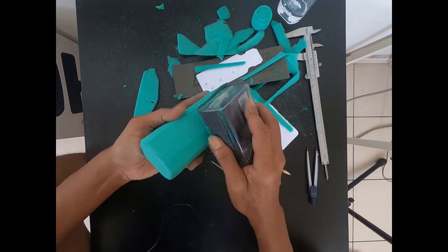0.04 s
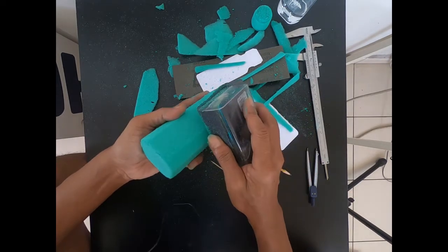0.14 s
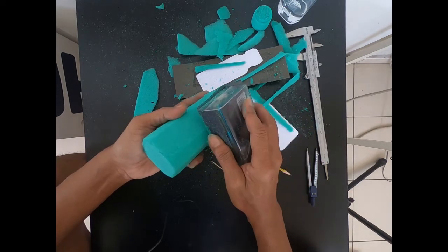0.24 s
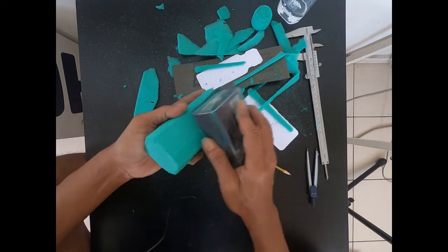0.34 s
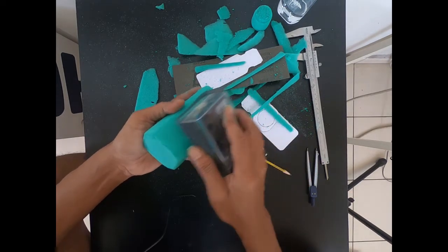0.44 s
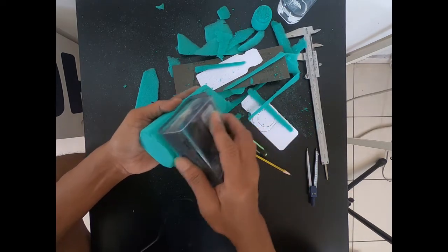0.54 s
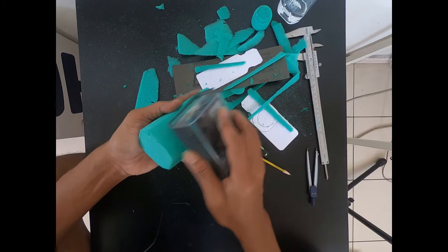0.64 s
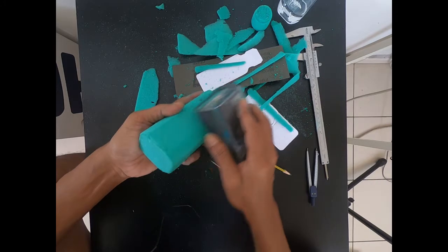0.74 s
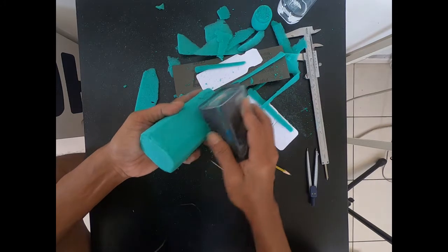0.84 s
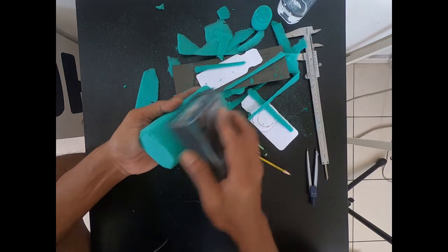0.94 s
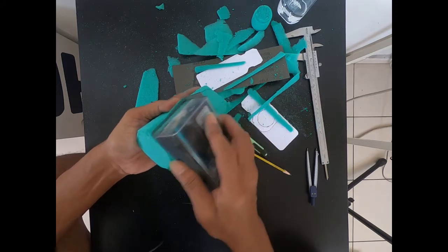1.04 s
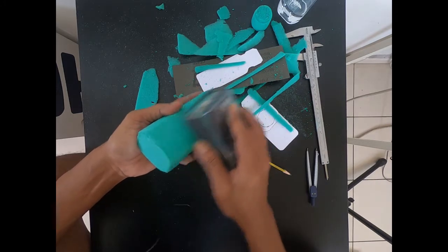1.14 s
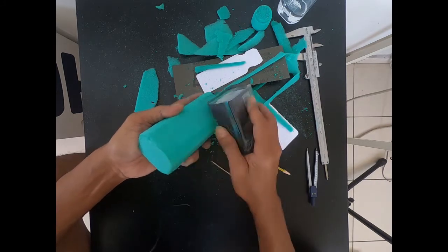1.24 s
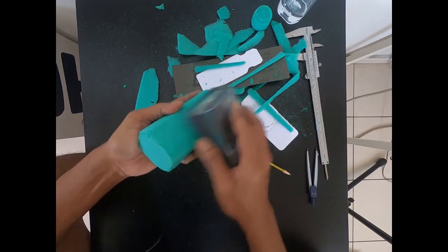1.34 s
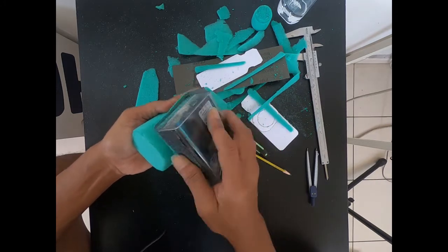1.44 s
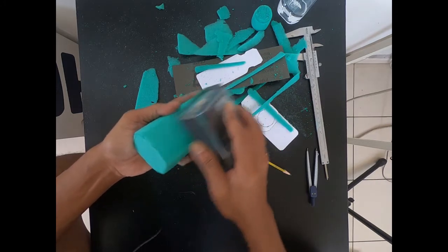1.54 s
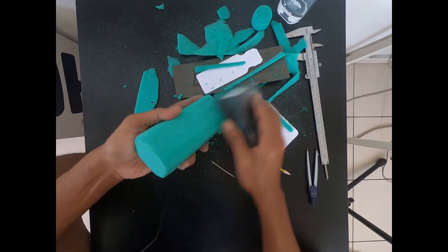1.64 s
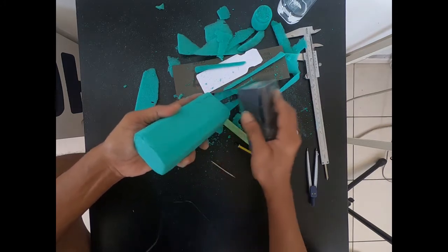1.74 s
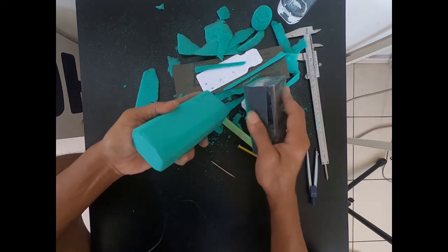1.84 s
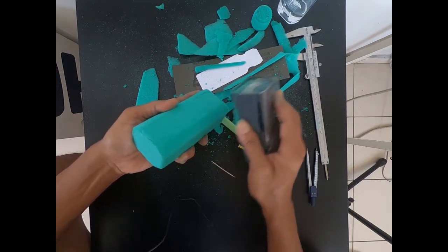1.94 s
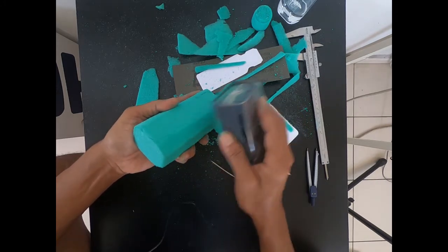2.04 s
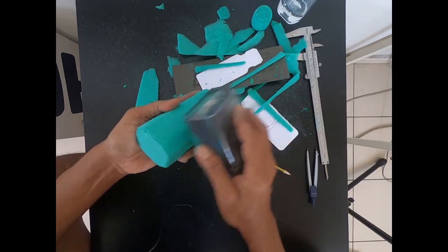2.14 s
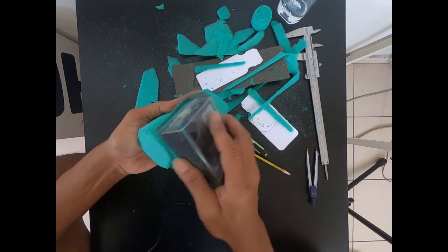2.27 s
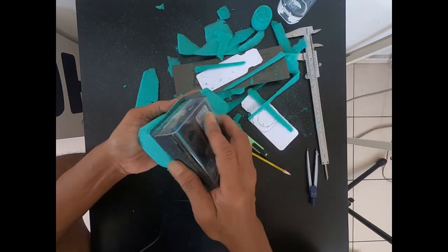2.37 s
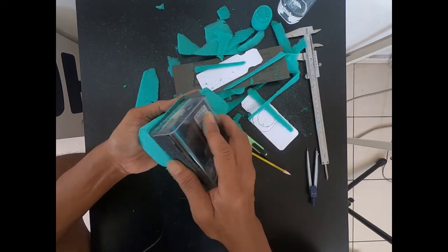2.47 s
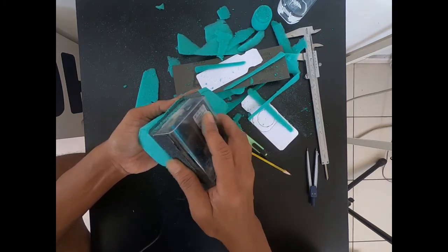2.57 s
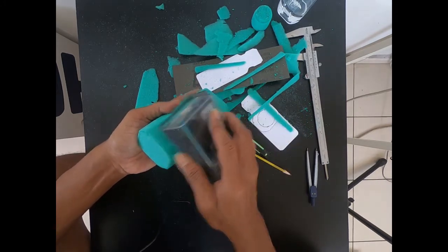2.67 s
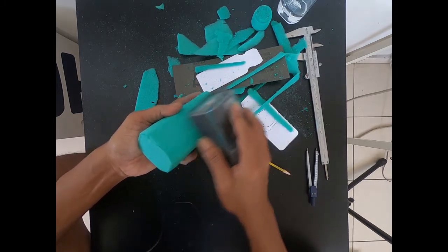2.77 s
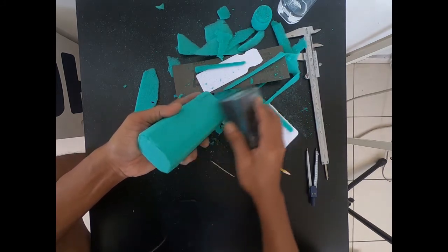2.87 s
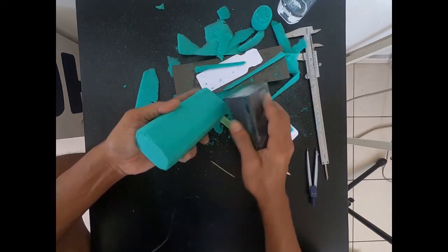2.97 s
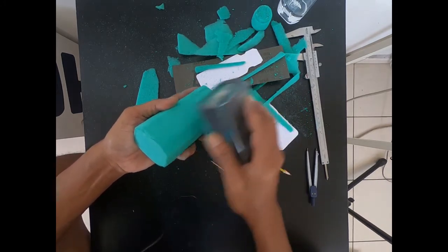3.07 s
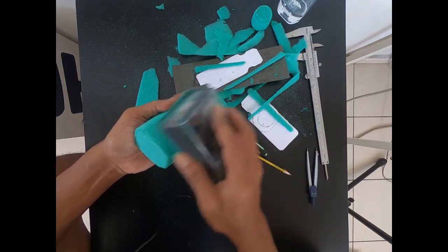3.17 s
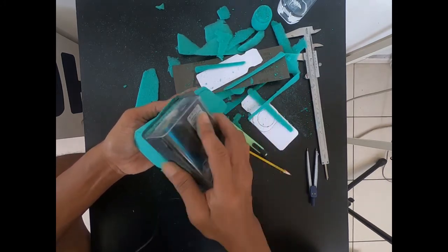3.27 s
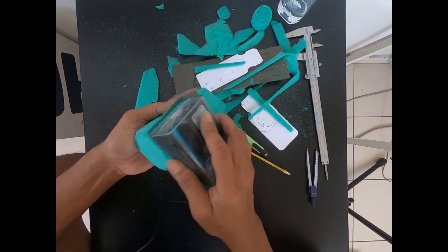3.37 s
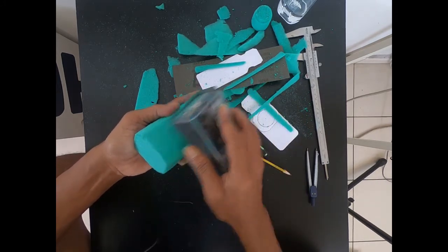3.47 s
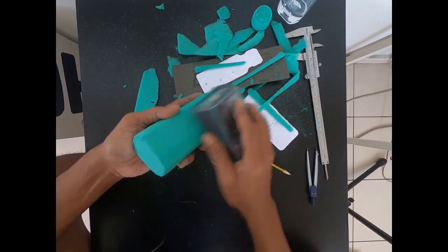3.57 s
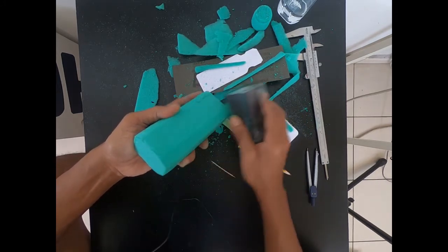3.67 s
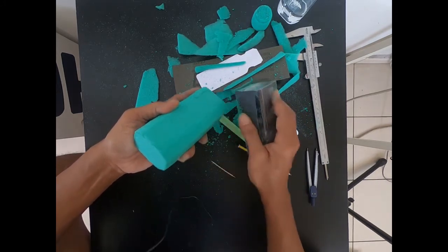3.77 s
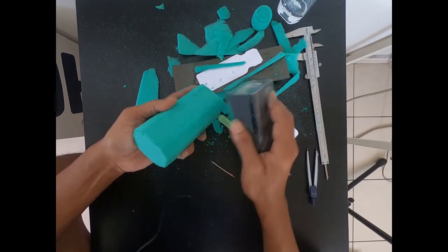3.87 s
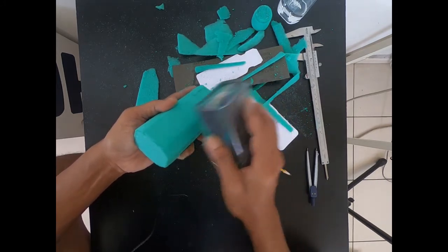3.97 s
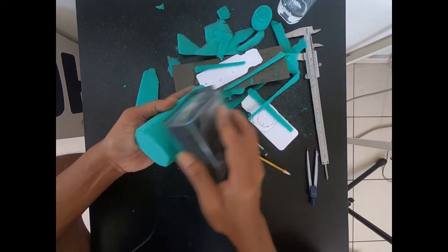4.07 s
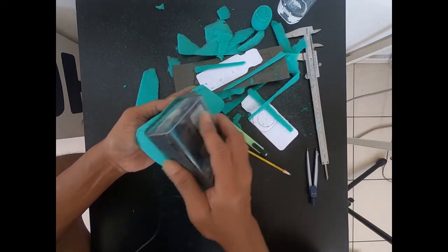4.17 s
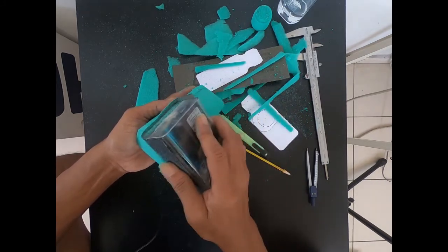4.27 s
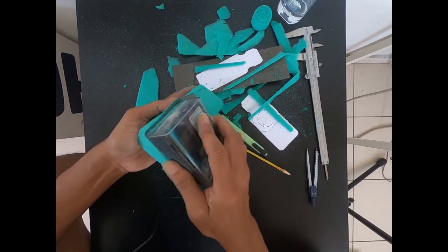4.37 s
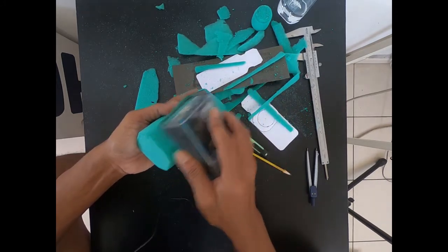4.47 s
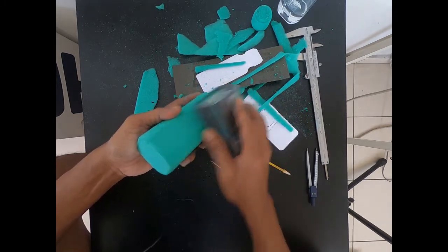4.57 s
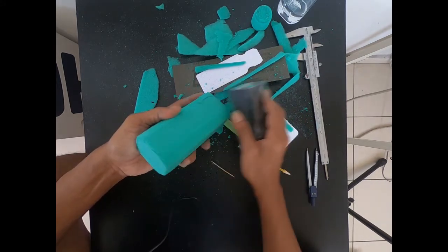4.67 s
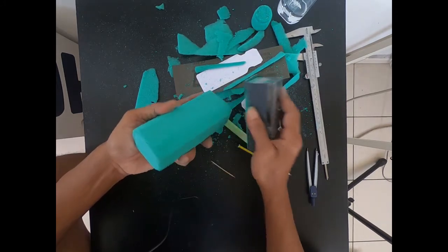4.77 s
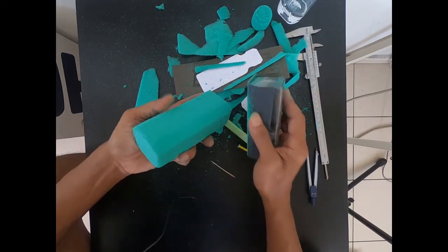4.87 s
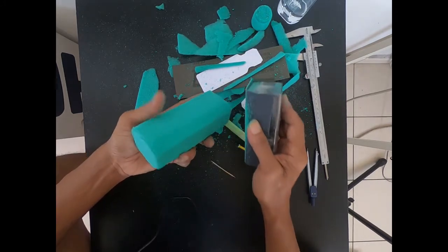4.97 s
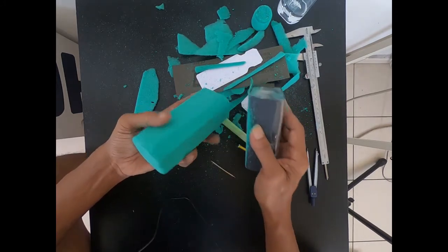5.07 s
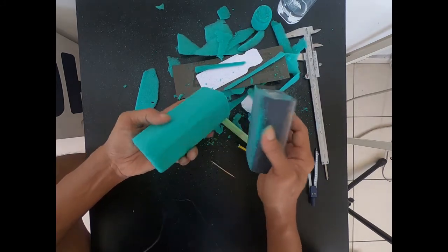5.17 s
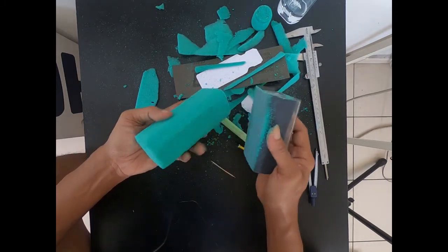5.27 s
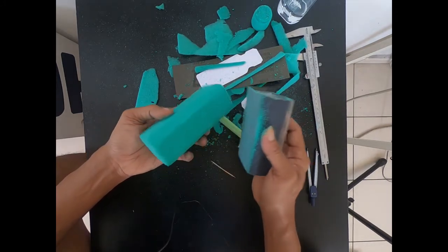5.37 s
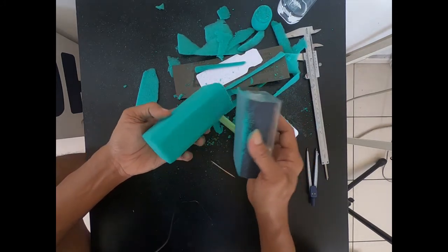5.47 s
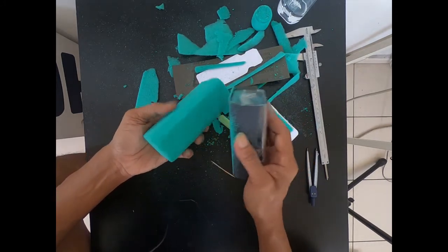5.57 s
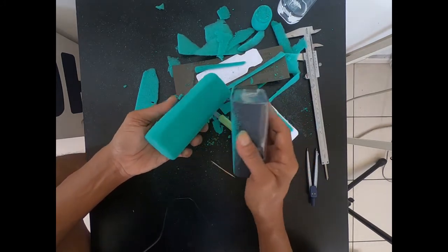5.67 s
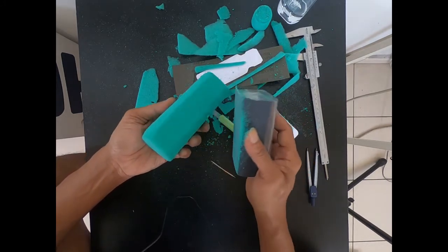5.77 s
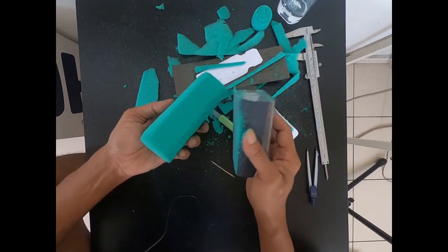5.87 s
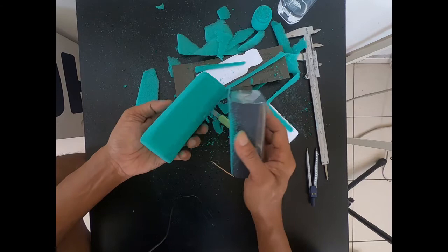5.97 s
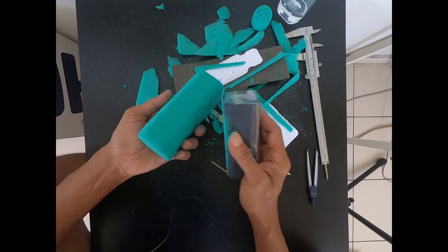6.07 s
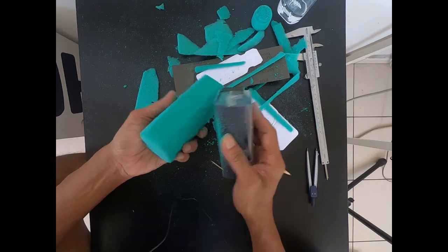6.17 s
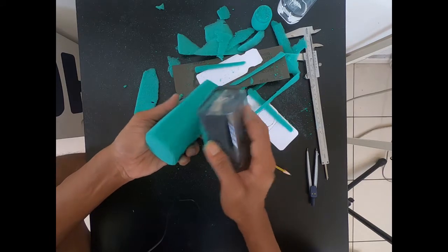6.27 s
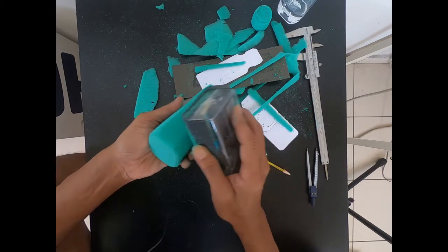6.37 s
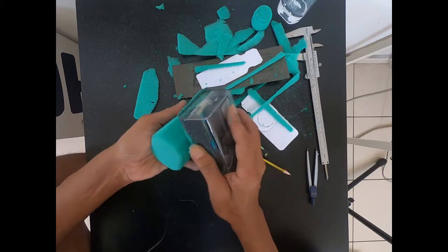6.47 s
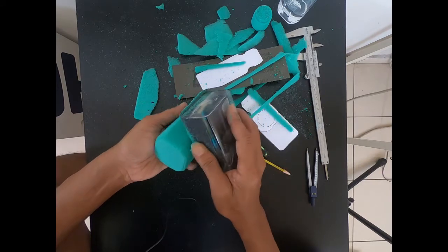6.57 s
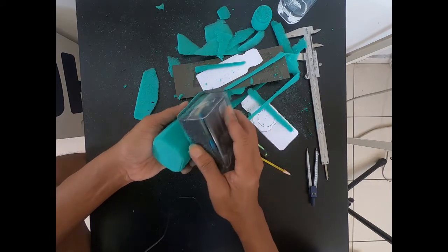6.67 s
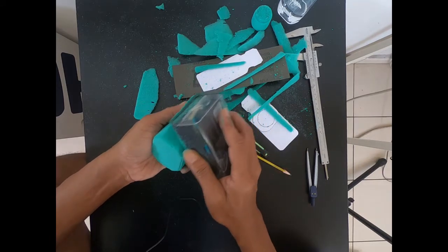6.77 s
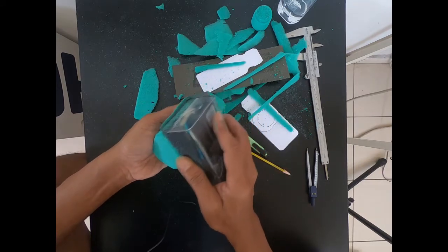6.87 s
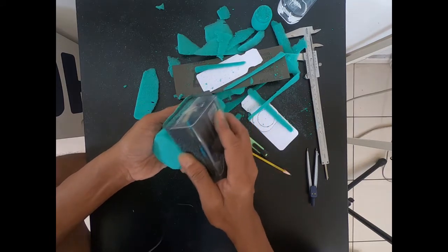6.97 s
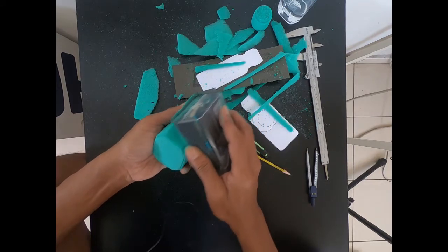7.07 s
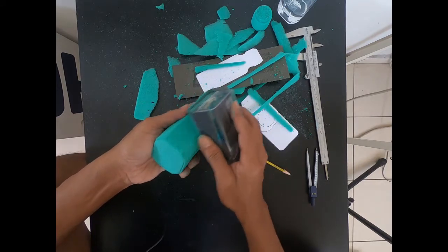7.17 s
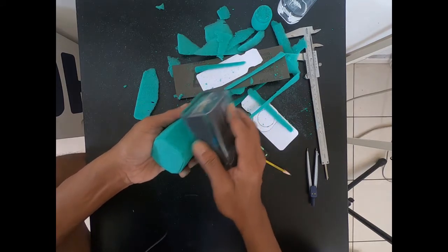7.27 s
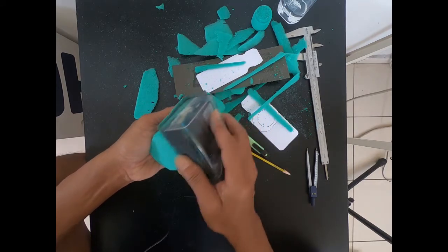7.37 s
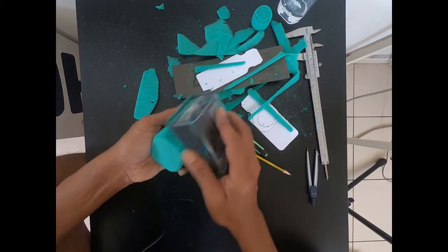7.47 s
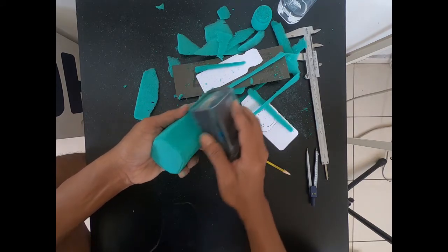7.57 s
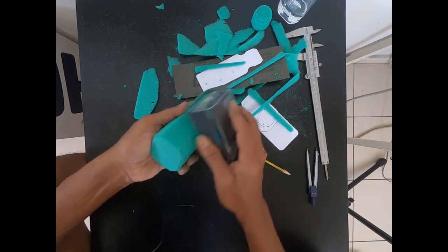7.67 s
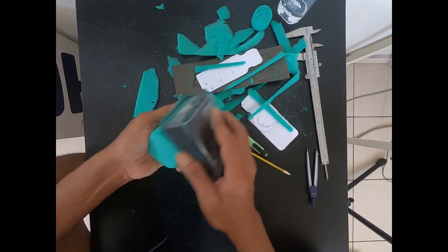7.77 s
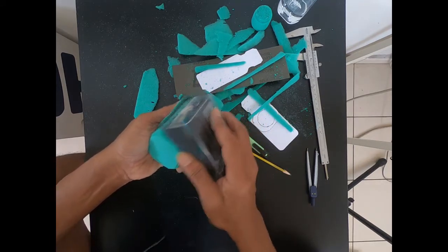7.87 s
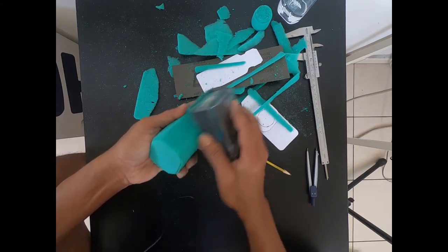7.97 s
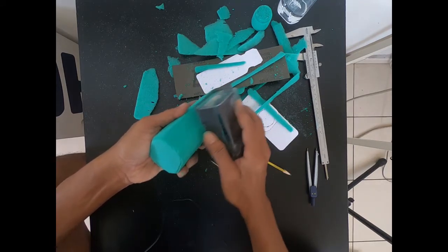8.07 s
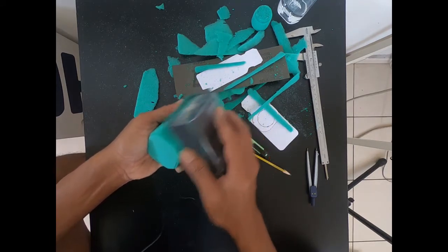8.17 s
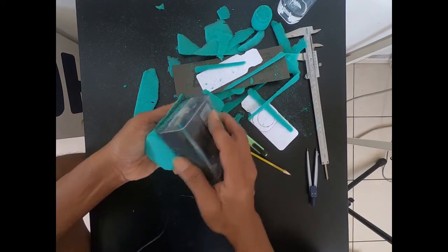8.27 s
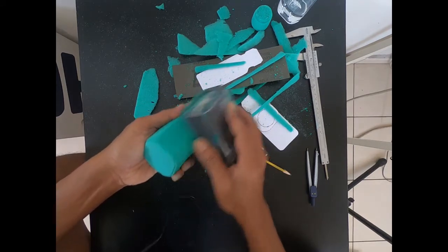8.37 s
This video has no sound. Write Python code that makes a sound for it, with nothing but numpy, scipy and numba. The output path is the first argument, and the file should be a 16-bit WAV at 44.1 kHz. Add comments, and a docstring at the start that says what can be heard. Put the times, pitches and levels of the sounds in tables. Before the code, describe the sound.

Close, mono sound of a hollow sanding block worked by hand over dense foam in a small hard-walled room. Faint brushes and tiny edge ticks open it; from 0.2 to 1.7 seconds six gritty strokes run together, swelling into firm, dry, bright rasps centred in the upper mids, with a hollow ring and fine dusty hiss. A quiet gap follows. Light scuffs at 2.35 lead to a single firm swipe from 2.6 to 2.95; others come at 3.35-3.65, after a sharp tick, and 4.35-4.65. From 5 to 6.65 there are only soft, patchy brushes and small catches as the pieces are turned. At 6.7 a weaker rub begins, then quick to-and-fro rasps, several per second, slightly lower and more ringing, continue to the end near 8.4. A short room tail, soft air noise and a wavering low hum stay behind everything.

```python
"""A sanding block is rubbed to and fro by hand over hard foam, close under one microphone in a tiled room.
Grit tears foam cells as random clicks that ring the foam, the hollow block and the gap between them.
Between the firm bursts, light brushes and scuffs are heard as the pieces turn in the fingers.
Hard walls return a short filtered-noise tail; shaped room noise and wavering low sines lie behind it all."""
import sys
import numpy as np
from scipy import signal
from scipy.fft import rfft, irfft, next_fast_len
from scipy.io import wavfile
from scipy.ndimage import uniform_filter1d
from numba import njit

SR = 44100
rng = np.random.default_rng(int(sys.argv[2]) if len(sys.argv) > 2 else 0)


def generate_wav(sig):
    """Save sig (samples, or channels by samples) to the path in sys.argv[1] as 16-bit PCM at SR."""
    pcm = np.round(np.clip(np.atleast_2d(sig).T, -1, 1) * 32767).astype(np.int16)
    wavfile.write(sys.argv[1], SR, pcm)


N = 370872

# Firm strokes: (touch [s], bite [s], peak [s], ease [s], stop [s],
# rasp at touch [dB], at bite [dB], at peak [dB], at ease [dB],
# block ring over rasp at bite [dB], at ease [dB], foam thrum over rasp at bite [dB], at ease [dB],
# gap band [dB], lower block ring [dB], upper foam ring [dB], echo share [0-1], run-off over the edge [0-1])
FIRM_STROKES = [ (.23, .326, .514, .572, .6, -45, -29, -21.5, -27, -11, -15, -22, -13, .5, -1, -4, .1, 0),
                (.6, .636, .68, .805, .838, -42, -23, -17.5, -23, -11, -13, -16, -17, 1, -.5, -3.5, .13, 0),
                (.838, .868, .915, 1.012, 1.06, -39, -27, -18.5, -21, -16, -9, -17, -16.5, 3, .5, -4, .18, 0),
                (1.06, 1.103, 1.149, 1.243, 1.28, -42, -19, -17.5, -17, -10, -14, -18, -17, 1.5, -1, -2.5, .05, .7),
                (1.28, 1.325, 1.355, 1.445, 1.482, -33, -26.5, -16.5, -23, -13, -9, -18, -19, 4, -5, -1.5, .2, 0),
                (1.482, 1.524, 1.62, 1.688, 1.7, -43, -20, -15.5, -16, -8, -16, -17, -20, 0, -2, -1, .14, .9),
                (2.58, 2.665, 2.8, 2.894, 2.955, -46, -22, -17, -19.5, -6, -13, -13, -19, .5, -11, 1, .01, .3),
                (3.345, 3.415, 3.58, 3.66, 3.67, -48, -24, -16.5, -17, -4, -13, -15, -21, 1, -7, -.5, .01, .9),
                (4.345, 4.39, 4.52, 4.636, 4.655, -48, -24.5, -16.5, -20, -5, -13, -12, -19, .5, -7, 1, .01, .8),
                (6.68, 6.715, 6.764, 6.825, 6.91, -39, -34, -26, -28, -14, -9, -24, -15, -1.5, -2, -1, .01, .3),
                (6.91, 6.965, 7.12, 7.172, 7.208, -43, -27.5, -18, -18, -9, -9, -13, -15, -2.5, -7, 3, .01, .1),
                (7.208, 7.235, 7.327, 7.361, 7.408, -38, -28.5, -19, -23.5, -8, -5, -21, -18, -2.5, -13, 1.5, .1, 0),
                (7.408, 7.459, 7.545, 7.583, 7.613, -47, -20.5, -16, -18.5, -11.5, -12, -15, -20, -4, -3.5, 2.5, .17, .3),
                (7.613, 7.641, 7.725, 7.78, 7.83, -35, -26.5, -18.5, -19, -7, -2, -18, -17, -2, -14, -1, .07, 0),
                (7.83, 7.889, 7.96, 8.003, 8.035, -45, -21.5, -15.5, -19, -7, -7, -14.5, -20, -3, -13, 5, .2, .1),
                (8.035, 8.07, 8.164, 8.212, 8.258, -34, -23, -17, -22.5, -5, -4, -17, -17, -2, -10, -1.5, .1, .1),
                (8.258, 8.293, 8.393, 8.42, 8.47, -41, -22, -15.5, -16.5, -7, -9, -18, -17, -2, -6.5, .5, .13, .1)]
# Block taken up anew: (from [s], gap band [Hz], block ring [Hz], its width [Hz],
# upper block ring over rasp [dB])
HAND_GRIPS = [(0, 4880, 2370, 400, -28), (6.68, 4450, 2320, 335, -15.5)]
# Colour of the tearing in the gap: (frequency [Hz], relative level per Hz [dB])
RASP_COLOUR = [(1700, -29), (2750, -4.5), (3050, -2), (3550, -2), (4000, 0), (5040, 0.5), (5620, -2),
               (6380, -16), (8000, -33.5)]
# Colour of the fine dust: (frequency [Hz], relative level per Hz [dB])
DUST_COLOUR = [(4000, -26.5), (6380, 3.5), (7500, 7), (9360, 8), (12000, 1), (15600, -13.5)]
# Rings of the foam under firm strokes: (frequency [Hz], width [Hz], relative level [dB])
FIRM_FOAM_RINGS = [(400, 250, -12.5), (700, 220, -2.5), (1144, 190, 4)]
# Rings of the foam held loosely: (frequency [Hz], width [Hz], relative level [dB])
LOOSE_FOAM_RINGS = [(596, 170, -11), (1067, 95, 4)]
# Light brushes: (time [s], rasp [dB], rise [s per 10 dB], hold [s], fall [s per 10 dB],
# foam thrum over rasp [dB], dust hiss over rasp [dB], gap band [Hz])
LIGHT_BRUSHES = [ (.02, -60, .05, 0, .06, -10, -9, 4200), (.064, -49, .004, .006, .012, -30, -13, 4420),
                 (.186, -57, .09, .02, .1, -18, -9, 4300), (.24, -49, .04, 0, .02, -22, -7, 4460),
                 (2.35, -39, .008, .056, .034, -25, -11.5, 4340), (2.498, -50, .012, 0, .07, -25, -8, 4500),
                 (3.29, -48, .004, .06, .02, -18, -9.5, 4570), (4.24, -48, .02, 0, .011, -15, -8, 4900),
                 (4.305, -48, .005, .045, .02, -14, -8, 4530),
                 (4.988, -49, .006, .06, .1, -16, -11.5, 4700), (5.146, -37, .04, 0, .04, -10, -13, 3920),
                 (5.2, -45, .03, .02, .03, -10, -13, 3850), (5.254, -38.5, .04, 0, .03, -15, -14, 4050),
                 (5.308, -42, .02, 0, .055, -10, -13.5, 3950), (5.408, -43.5, .09, 0, .04, -17, -14, 4100),
                 (5.448, -46.5, .1, 0, .03, -18, -15, 3920), (5.518, -45, .036, 0, .03, -14, -15, 4280),
                 (5.57, -36.5, .015, .045, .028, -16, -14, 4050), (5.65, -50, .02, 0, .09, -13, -13, 4240),
                 (5.76, -47.5, .045, 0, .03, -16, -14, 3900), (5.828, -56.5, .03, 0, .05, -3, -12, 4160),
                 (5.922, -55, .005, .03, .03, -12, -12, 4670), (5.976, -45, .03, 0, .045, -12, -14, 4100),
                 (6.016, -44, .04, 0, .045, -15, -14, 4120), (6.1, -41, .04, .03, .045, -13, -16, 4420),
                 (6.2, -47, .03, 0, .02, -16, -16, 4150), (6.288, -37, .065, 0, .028, -15, -14, 4360),
                 (6.414, -53, .016, 0, .018, -9, -11, 4100), (6.474, -43, .022, 0, .022, -17, -14, 4230),
                 (6.512, -42, .015, .06, .04, -22, -13, 4170), (6.64, -39.5, .07, 0, .08, -11, -12, 4380)]
# Short scuffs, an edge catching: (time [s], peak level [dB], length [s])
EDGE_SCUFFS = [(0.0353, -38, 0.006), (0.065, -36, 0.006), (0.073, -46, 0.006), (0.1216, -38, 0.006),
               (0.1805, -45, 0.006), (0.2104, -35, 0.006), (0.2244, -39, 0.006), (2.3393, -29, 0.006),
               (2.449, -45, 0.006), (2.5017, -41, 0.006), (2.544, -34, 0.006), (2.5731, -31, 0.0066),
               (2.6, -22, 0.006), (3.2764, -19, 0.0085), (4.2233, -38.5, 0.006), (4.238, -40.5, 0.006),
               (4.3036, -37, 0.006), (4.983, -41, 0.006), (5.399, -27, 0.006), (5.92, -48, 0.006),
               (5.963, -43, 0.006), (6.451, -37, 0.0062), (6.471, -28, 0.006), (6.504, -26, 0.006),
               (6.7042, -34, 0.006)]
# Colour of the room noise: (frequency [Hz], relative level per Hz [dB])
AIR_COLOUR = [(20, -0.5), (31, -12.5), (45, -4), (70, -9), (110, -14.5), (160, -16), (250, -18), (500, -21),
              (1050, -24), (1700, -29.5), (3000, -39), (5200, -44), (6300, -52), (15600, -54.5)]
# Low hum, middle of its waver: (time [s], frequency [Hz], level [dB])
HUM_CURVE = [(0, 67.5, -46), (.19, 69.4, -50), (.68, 69.1, -49), (.95, 62, -60), (1.11, 68.7, -46),
             (1.33, 65, -58), (1.43, 62.1, -48), (1.7, 69.8, -53), (1.98, 64.2, -43), (2.08, 63.5, -54),
             (2.95, 63.8, -45), (3.35, 69.6, -50), (3.51, 67.9, -41), (3.97, 67.4, -56), (4.1, 65.2, -48),
             (5.28, 65, -47.5), (5.46, 65.5, -39.5), (5.64, 65.3, -44), (5.84, 65.5, -39),
             (5.98, 65.2, -48), (6.09, 65.3, -42.5), (7.5, 63.5, -49), (8.41, 66, -51)]
# Fainter drone, middle of its waver: (time [s], frequency [Hz], level [dB])
DRONE_CURVE = [(0, 88.3, -57), (4.5, 88, -57), (4.7, 88, -54), (8.41, 88.5, -54)]
# Mains lines, middle of their waver: (frequency [Hz], level [dB])
MAINS_LINES = [(100, -61.5), (200, -57), (300, -67)]

# rings with a level of their own: (frequency [Hz], width [Hz])
LOW_BLOCK_RING, HIGH_BLOCK_RING, HIGH_FOAM_RING = (2099, 260), (3190, 480), (1487, 180)
GAP_WIDTH_HZ, GAP_WANDER_HZ = 700., 120
DWELL_S = .015  # the block rests this long before it starts to bite
LIFT_DB = -43  # rasp as the block leaves the foam
# at the firm level the cells tear at this rate; thrum and dust [dB per dB] grow less than the rasp
FIRM_DB, FIRM_TEARS_PER_S = -18, 15000
THRUM_SLOPE, DUST_DB, DUST_SLOPE = -.3, -11.8, -.15
# full run-off: the gap band sinks, ring and hiss thin out
RUN_OFF_S, RUN_OFF_HZ, RUN_OFF_DB = .07, 550, -8
ECHO_MS = 1.31
# light contact: ring over rasp; thrum and dust [dB per dB] fade less than the rasp, down to a floor
BRUSH_RING_DB, BRUSH_THRUM_SLOPE, BRUSH_DUST_SLOPE, BRUSH_FLOOR_DB = -13, -.35, -.2, -15
SCUFF_CREST_DB = 16.5  # peak of a scuff over its rms
ROOM_T60_S, ROOM_DB, ROOM_TOP_HZ = 0.37, -17, 6200
AIR_DB = -52.5  # room noise above 250 Hz
TOP_HZ = 15720


def strokes():
    """Firm strokes: the louder the rub, the more cells tear a second; the grip chatters a little."""
    t = np.arange(N) / SR
    columns = np.transpose(FIRM_STROKES)
    touch, bite, peak, ease, stop = columns[:5]
    touch_db, bite_db, peak_db, ease_db = columns[5:9]
    ring_db, ring_end_db, thrum_db, thrum_end_db = columns[9:13]

    def line(times, values):
        times = np.maximum.accumulate(np.transpose(times).ravel())
        return np.interp(t, times, np.transpose(values).ravel())

    # a stroke that turns straight back ends at the level where the next one starts
    turns_back = np.append(touch[1:] - stop[:-1], 1) < .01
    stop_db = np.where(turns_back, np.roll(touch_db, -1), LIFT_DB)
    db = line([touch + DWELL_S, bite, peak, ease, stop], [touch_db, bite_db, peak_db, ease_db, stop_db])

    now = np.maximum(np.searchsorted(touch, t, "right") - 1, 0)
    touching = (t >= touch[0]) & (t < stop[now] + .01)
    gate = uniform_filter1d(1. * touching, int(.013 * SR))
    gap_db, low_db, high_db, share, run_off = (c[now] for c in columns[13:])
    since, *held = np.transpose(HAND_GRIPS)
    grip = np.searchsorted(since, t, "right") - 1
    gap_hz, block_hz, block_width_hz, upper_db = (c[grip] for c in held)
    edge = run_off * np.clip(1 + (t - ease[now]) / RUN_OFF_S, 0, 1)

    over_firm_db = db - FIRM_DB
    tears = grit(FIRM_TEARS_PER_S * undb(.4 * over_firm_db), spread_db=3.0)
    tears = tears * undb(0.74 * walk(400))
    ring_now_db = line([bite, ease], [ring_db, ring_end_db]) + RUN_OFF_DB * edge + 2.5 * walk(25)
    thrum_now_db = line([bite, ease], [thrum_db, thrum_end_db]) + THRUM_SLOPE * over_firm_db
    thrum_now_db = thrum_now_db + 1.5 * walk(25)
    dust_now_db = DUST_DB + DUST_SLOPE * over_firm_db + RUN_OFF_DB * edge
    gap_now_hz = gap_hz - RUN_OFF_HZ * edge + GAP_WANDER_HZ * walk(15)
    rubbed = rub(tears, FIRM_FOAM_RINGS, ring_now_db, thrum_now_db, dust_now_db,
                 gap_now_hz, block_hz, block_width_hz, gap_db, low_db, high_db)
    upper_block = unit(single_ring(single_ring(tears, *HIGH_BLOCK_RING), *HIGH_BLOCK_RING))
    rubbed = rubbed + undb(upper_db + 2.5 * walk(20)) * upper_block
    return echo(gate * undb(db + .8 * walk(60)) * rubbed, ECHO_MS, np.clip(share, 0, 1))


def rub(tears, foam_modes, ring_db, thrum_db, hiss_db, gap_hz, block_hz, block_width_hz,
        gap_db, low_db, high_db):
    """What the tearing sets off: rasp in the gap, ring of the block, thrum of the foam, hiss of fine dust."""
    rasp = unit(colour(tears, RASP_COLOUR))
    # the air gap between the pieces lifts a moving band
    rasp = rasp + (undb(gap_db) - 1) * svf(rasp, gap_hz, np.full(N, GAP_WIDTH_HZ))
    # patches of grit bite unevenly, so a narrow bright spot wanders through the rasp
    bright_hz = 4300 * 2 ** (0.27 * walk(14))
    rasp = rasp + 0.57 * svf(rasp, bright_hz, np.full(N, 300.))

    block = unit(svf(svf(tears, block_hz, block_width_hz), block_hz, 2 * block_width_hz))
    low_hz, low_width_hz = LOW_BLOCK_RING
    low_block = single_ring(single_ring(tears, low_hz, low_width_hz), low_hz, 2 * low_width_hz)
    block = block + undb(low_db) * unit(low_block)

    soft = colour(tears, [(150, -23.5), (300, 0.5), (1600, -4.5), (2500, 6.5)])
    high_foam = unit(single_ring(soft, *HIGH_FOAM_RING))
    foam = unit(ring(soft, foam_modes)) - undb(high_db) * high_foam

    dust = unit(colour(.5 * tears + rng.standard_normal(N), DUST_COLOUR))
    return rasp + undb(ring_db) * block + undb(thrum_db) * foam + undb(hiss_db) * dust


def grit(per_s, spread_db):
    """Cells tearing at random moments, some larger than the rest; power 1 at any rate."""
    share = np.clip(per_s / SR, 1e-4, 1)
    size = unit(undb(spread_db * rng.standard_normal(N))) * rng.choice([-1, 1], N)
    return size * (rng.random(N) < share) / np.sqrt(share)


def echo(x, ms, share):
    """A dull copy arrives a moment late and combs the colour."""
    i = np.arange(N)
    late = colour(np.interp(i - ms * SR / 1000, i, x), [(4500, 0), (9000, -10)])
    return (x + share * late) / np.sqrt(1 + share ** 2)


def handling():
    """Light contact is sparse and patchy; a scuff is a short burst of the same tearing."""
    t = np.arange(N) / SR
    start, top_db, rise, hold, fall, thrum_db, dust_db, gap_hz = np.transpose(LIGHT_BRUSHES)[:, :, None]
    before, after = np.maximum(start - t, 0), np.maximum(t - start - hold, 0)
    below_db = -10 * (before / rise + after / fall)
    now = np.argmax(top_db + below_db, axis=0)  # the loudest brush sets level and colour
    below_db = below_db[now, np.arange(N)]
    force = undb(top_db[now, 0] + below_db + 1.1 * walk(70) + 1.6 * walk(250))

    for scuff_s, peak_db, length in EDGE_SCUFFS:
        u = np.arange(int(4 * length * SR)) / (length * SR)
        at = int(scuff_s * SR)
        burst = np.minimum(8 * u, 1) * np.exp(-u ** 3)
        force[at:at + len(u)] += undb(peak_db - SCUFF_CREST_DB) * burst

    fade_db = np.maximum(below_db, BRUSH_FLOOR_DB)
    thrum_now_db = thrum_db[now, 0] + BRUSH_THRUM_SLOPE * fade_db
    dust_now_db = dust_db[now, 0] + BRUSH_DUST_SLOPE * fade_db
    gap_now_hz = uniform_filter1d(gap_hz[now, 0], size=900)
    contact = rub(grit(6000., spread_db=3.5), LOOSE_FOAM_RINGS, BRUSH_RING_DB, thrum_now_db, dust_now_db,
                  gap_now_hz, block_hz=np.full(N, 2850.), block_width_hz=np.full(N, 600.),
                  gap_db=2.0, low_db=-1.0, high_db=-11.0)
    # a shallow dip near 5.5 kHz
    return force * colour(contact, [(2500, -0.34), (3200, 0.92), (5500, -1.5), (7000, 0.92)])


def room(x):
    """Hard walls give a short diffuse tail, decaying noise softened at both ends of the spectrum."""
    t = np.arange(int(.6 * SR)) / SR
    tail = rng.standard_normal(len(t)) * undb(-60 * t / ROOM_T60_S) * (t > .004)
    tail = colour(tail, [(300, -3), (ROOM_TOP_HZ, 0), (15000, -6)])
    tail = tail / np.sqrt(np.sum(tail ** 2))
    return undb(ROOM_DB) * signal.fftconvolve(x, tail)[:N]


def background():
    """Room noise, a low hum and a fainter drone that swell and fade, mains lines that waver."""
    air = colour(rng.standard_normal(N), AIR_COLOUR) * undb(.9 * walk(3))
    above = signal.sosfilt(signal.butter(4, 250, "high", fs=SR, output="sos"), air)
    out = air * undb(AIR_DB) / np.std(above)
    for curve in (HUM_CURVE, DRONE_CURVE):
        s, hz, db = np.transpose(curve)
        hz, db = (np.interp(np.arange(N) / SR, s, c) for c in (hz, db))
        out = out + tone(hz + .7 * walk(8), db + 2.2 * walk(8))
    for hz, db in MAINS_LINES:
        out = out + tone(hz + 1.7 * walk(12), db + 3.4 * walk(14))
    return out


def tone(hz, db):
    """A sine on a pitch curve and a level curve (rms)."""
    return np.sqrt(2) * undb(db) * np.sin(2 * np.pi * (np.cumsum(hz) / SR + rng.random()))


def undb(db):
    """Gain of a level in dB."""
    return 10 ** (np.asarray(db) / 20)


def unit(x):
    """Scale to rms 1."""
    return x / np.sqrt(np.mean(x ** 2))


def colour(x, points):
    """Shape a sound by (frequency [Hz], level [dB]) points."""
    size = next_fast_len(len(x))
    hz, db = np.transpose(points)
    bins_hz = np.fft.rfftfreq(size, 1 / SR)
    gain = undb(np.interp(np.log(bins_hz + 1), np.log(hz), db))
    return irfft(rfft(x, size) * gain, size)[:len(x)]


@njit
def svf(x, hz, width):
    """State-variable band-pass with moving centre and width, gain 1 at the centre."""
    y, band, low = np.empty(len(x)), 0., 0.
    for i in range(len(x)):
        g, k = np.tan(np.pi * hz[i] / SR), width[i] / hz[i]
        v = (band + g * (x[i] - low)) / (1 + g * (g + k))
        band, low, y[i] = 2 * v - band, low + 2 * g * v, k * v
    return y


def single_ring(x, hz, width):
    """One fixed resonance."""
    return svf(x, np.full(N, 1. * hz), np.full(N, 1. * width))


def ring(x, modes):
    """Sum of fixed resonances; neighbours swing in opposite sense."""
    return sum((-1) ** k * undb(db) * single_ring(x, hz, width) for k, (hz, width, db) in enumerate(modes))


def walk(rate):
    """Random levels held 1 / rate s and slewed twice; spread near 1."""
    k = int(SR / rate)
    steps = np.repeat(rng.standard_normal(N // k + 1), k)
    return 1.22 * uniform_filter1d(uniform_filter1d(steps, k), k)[:N]


def scene():
    """One microphone hears it all, so both channels are alike."""
    near = strokes() + handling()
    return np.tile(near + room(near) + background(), (2, 1))


def record(dry):
    """Peaks are rounded and the top is cut."""
    rounded = .95 * np.tanh(dry / .95)
    return signal.sosfilt(signal.ellip(12, .2, 90, TOP_HZ, fs=SR, output="sos"), rounded)


dry = scene()
out = record(dry)
generate_wav(out)
```